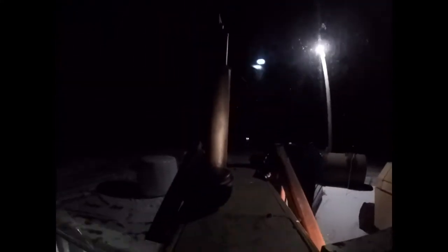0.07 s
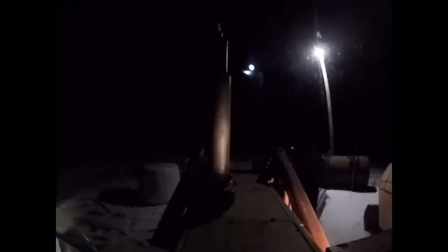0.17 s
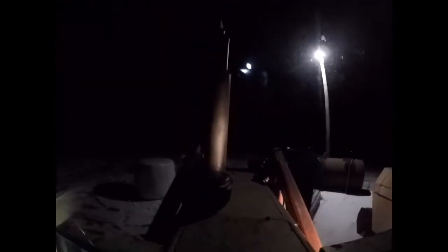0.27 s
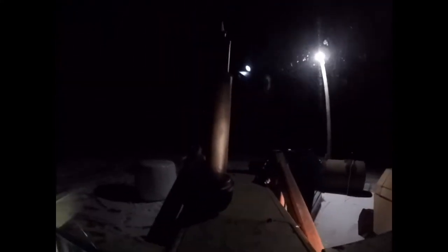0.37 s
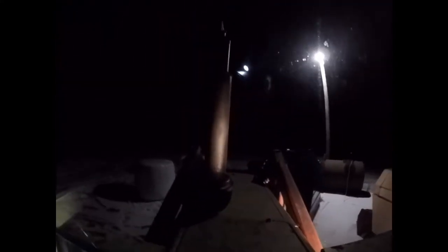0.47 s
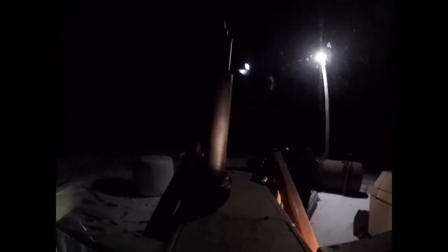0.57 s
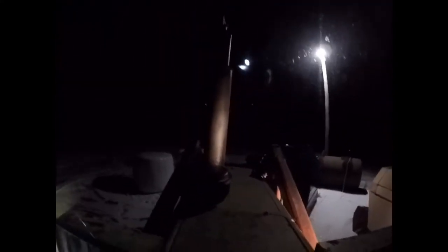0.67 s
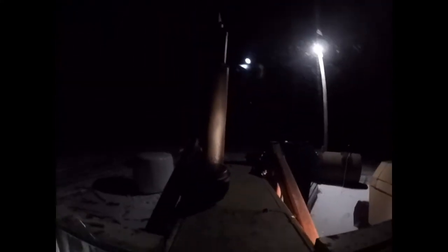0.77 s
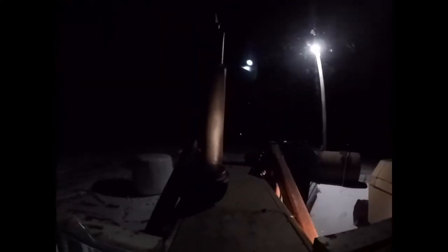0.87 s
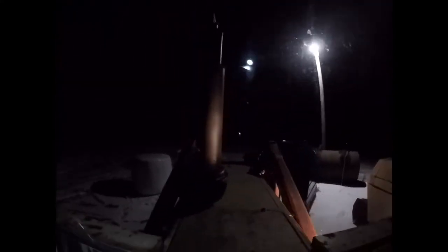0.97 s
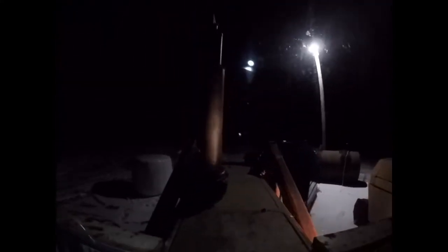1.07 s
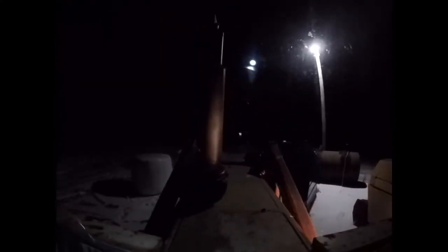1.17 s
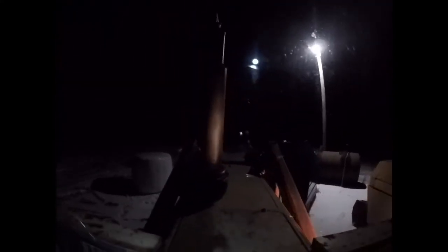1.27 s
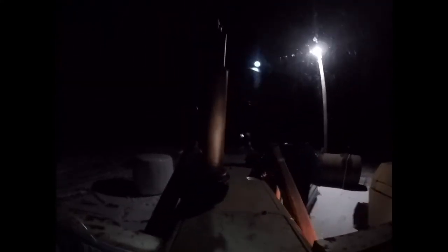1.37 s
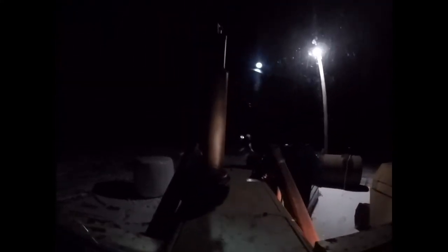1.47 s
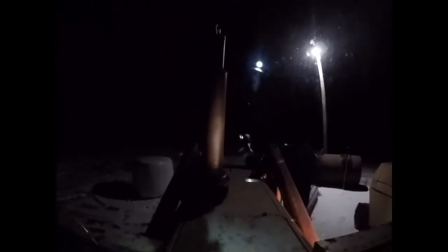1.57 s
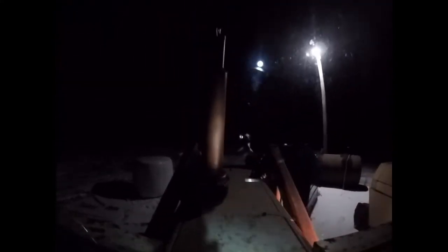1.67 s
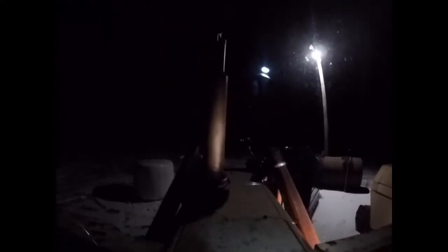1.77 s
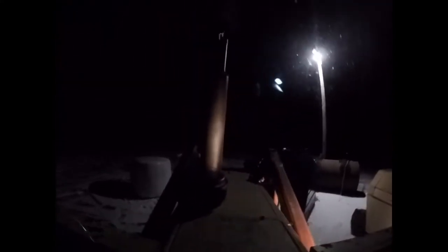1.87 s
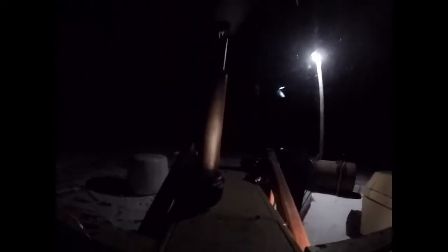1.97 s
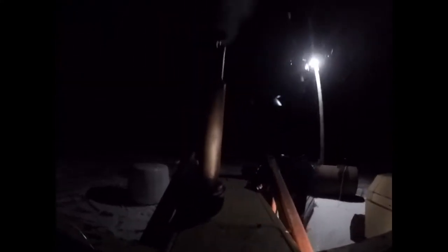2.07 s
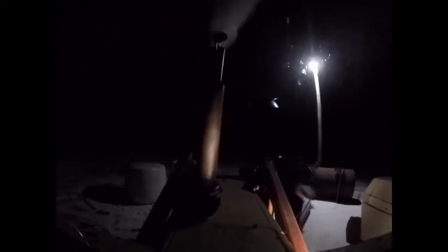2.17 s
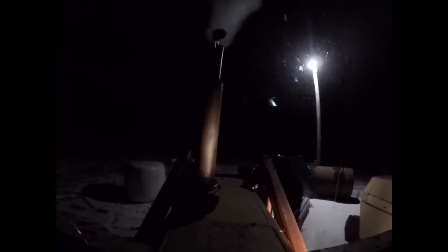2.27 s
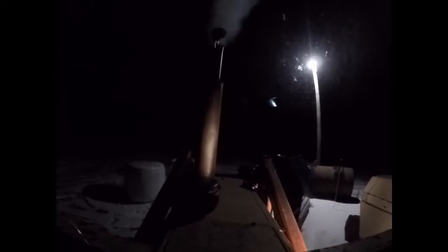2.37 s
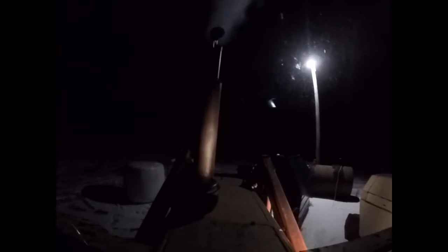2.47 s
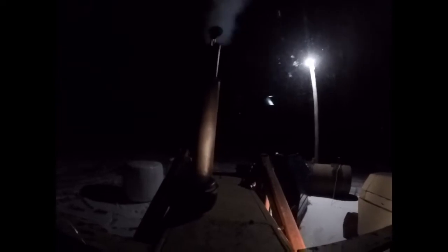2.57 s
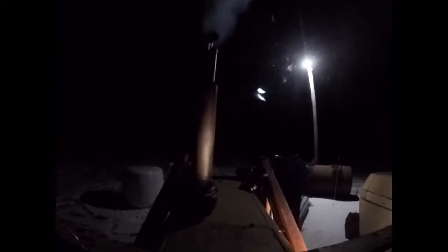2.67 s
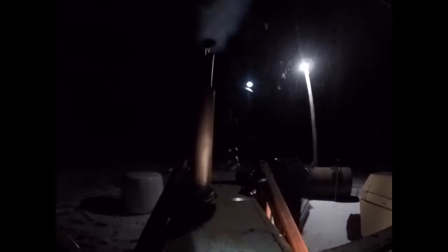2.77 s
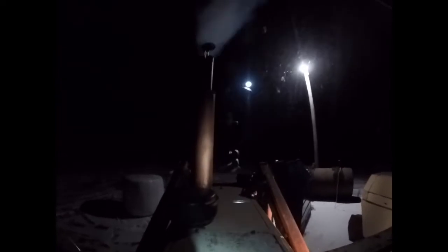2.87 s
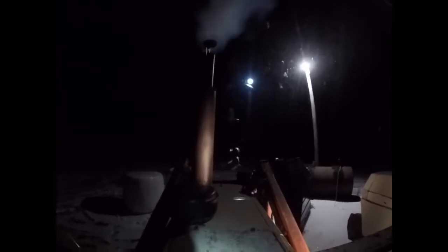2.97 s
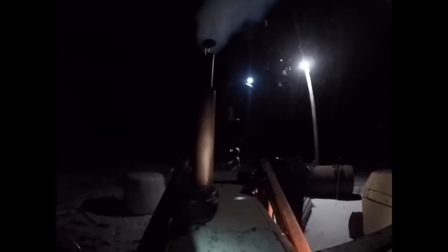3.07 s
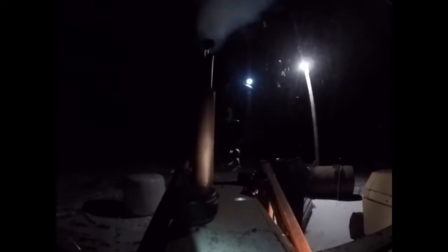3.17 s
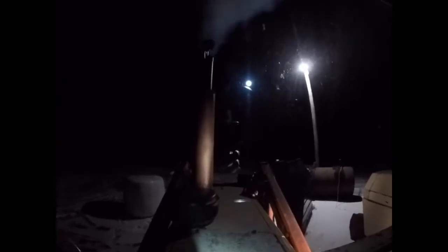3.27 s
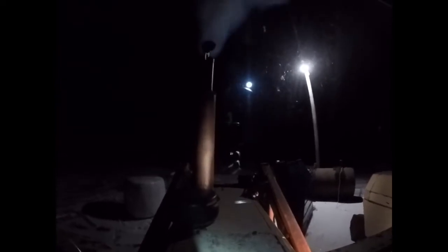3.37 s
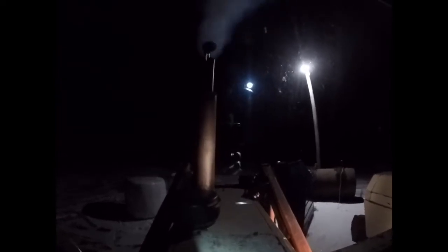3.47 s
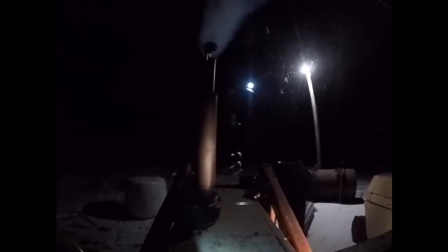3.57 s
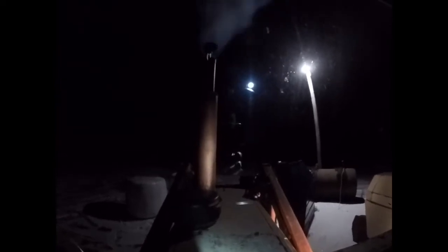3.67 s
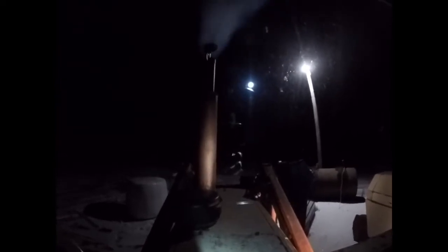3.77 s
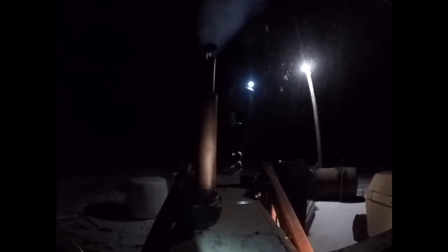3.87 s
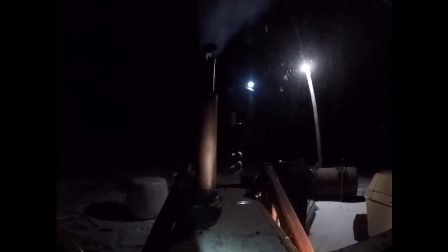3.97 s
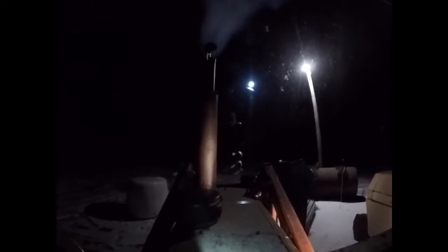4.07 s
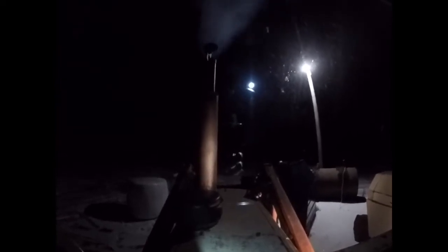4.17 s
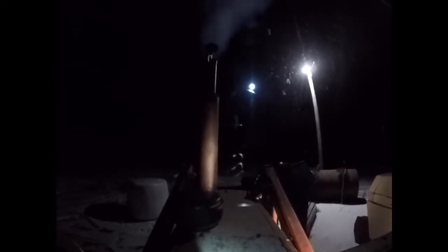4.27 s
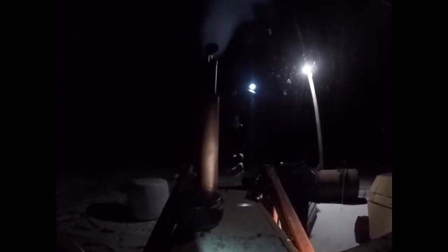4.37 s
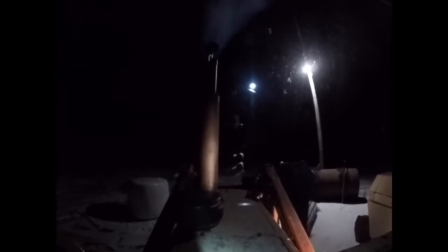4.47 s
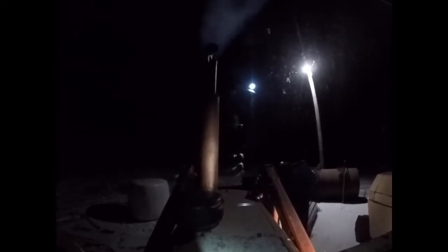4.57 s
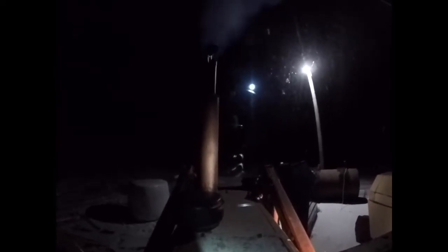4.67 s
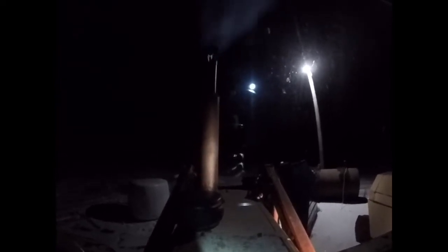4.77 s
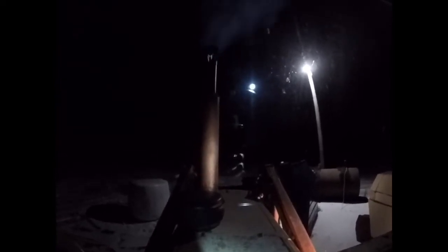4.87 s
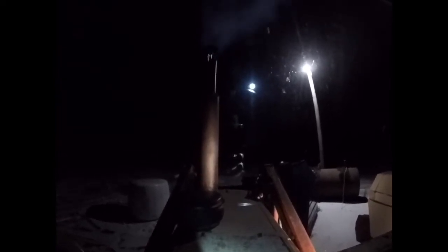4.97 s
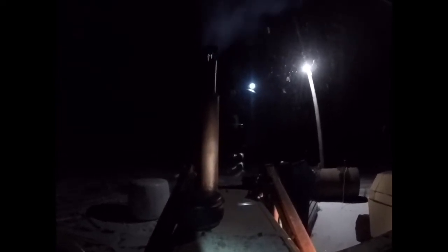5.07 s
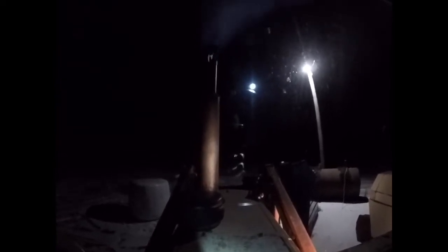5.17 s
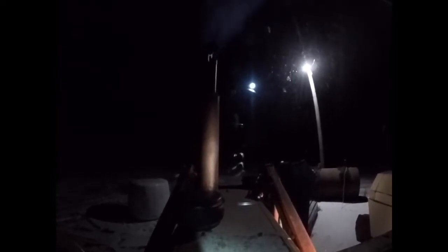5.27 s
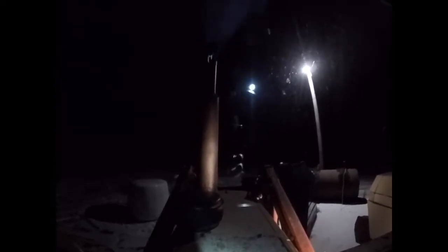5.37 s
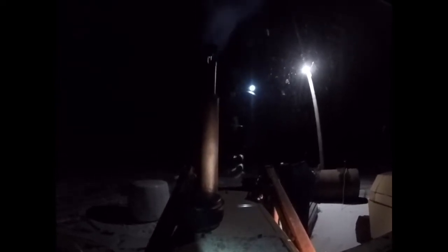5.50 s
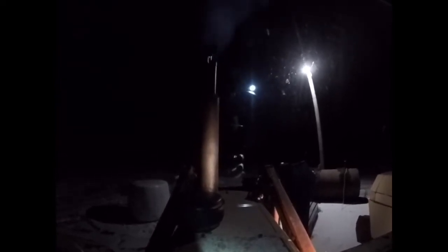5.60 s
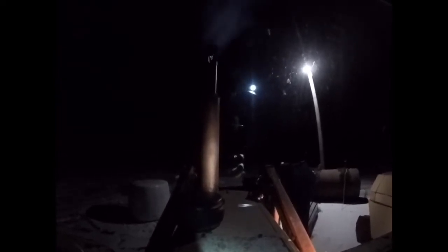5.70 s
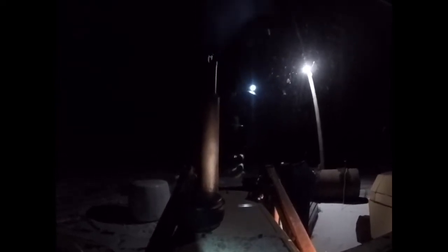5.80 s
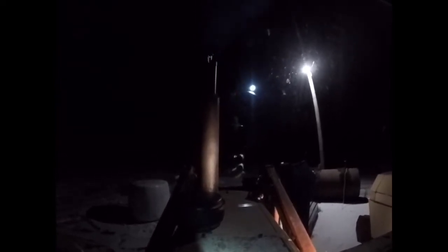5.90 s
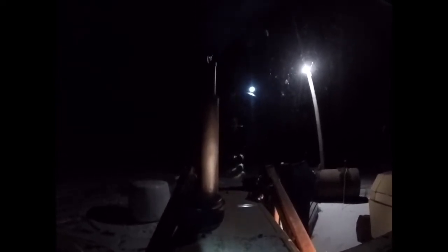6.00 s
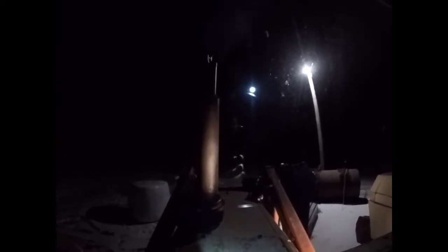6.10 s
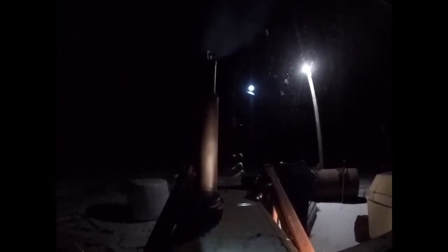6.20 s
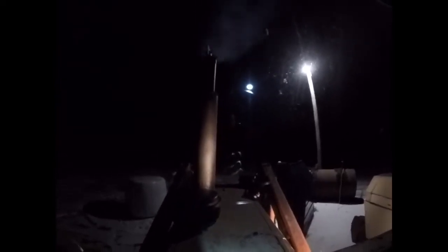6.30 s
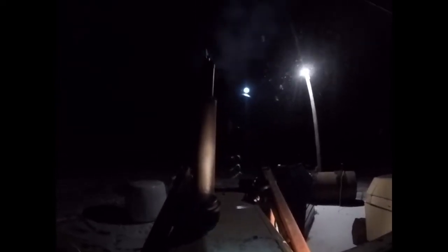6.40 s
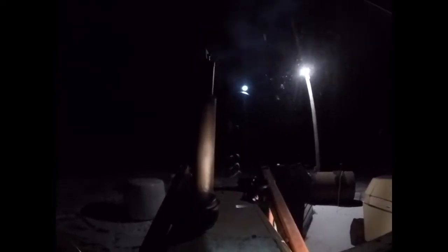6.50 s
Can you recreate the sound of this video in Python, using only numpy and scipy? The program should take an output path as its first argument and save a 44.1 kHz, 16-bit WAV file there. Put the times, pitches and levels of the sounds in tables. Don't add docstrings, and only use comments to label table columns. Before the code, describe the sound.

For the first 0.8 seconds the tractor cab is nearly silent: faint hiss, low handling bumps and small, soft clicks of switches and levers. At about 0.85 a solenoid clunks and the starter bites, a gritty, rasping whine that sags on compressions, with dull thumps, until 1.2. Around 1.3 to 1.4 the diesel catches with heavy thuds and puffs, heaving unevenly as it races up until about 2.1. By 2.5 it holds a fast, loud, boomy drone with panel rattle, valve clatter and irregular cold knocks once a cycle. Loose door and glass parts buzz between 3.2 and 4.4. From 4.5 the knocking is gone, the tone is warmer and smoother, with a very faint high turbo whistle. At 5.95 the throttle closes; pitch slides down, clatter dulls, soft leaking hisses pulse each cycle, and the sound cuts off at about 6.5, still running.

```python
import sys
import numpy as np
from scipy import signal
from scipy.io import wavfile
from scipy.ndimage import uniform_filter1d

SR = 44100
rng = np.random.default_rng(int(sys.argv[2]) if len(sys.argv) > 2 else 0)


def ratio_of_db(decibels):
    return 10 ** (np.asarray(decibels, float) / 20)


def unload_wav(signal):
    wavfile.write(
        sys.argv[1],
        SR,
        np.round(np.clip(np.atleast_2d(signal).T, -1, 1) * 32767).astype(np.int16),
    )


N = 288414

# (time [s], firing rate [Hz])
SPEED = [(1.25, 18), (1.45, 27.3), (1.55, 32), (1.7, 39.3), (1.86, 51), (1.95, 56), (2.05, 59.5),
         (2.35, 66), (2.55, 66.7), (2.9, 66.2), (3.2, 67.15), (4.1, 67.8), (4.5, 68.5), (5.6, 68.27),
         (5.95, 68.4), (6.08, 64), (6.35, 50.6), (6.55, 43.6)]
# (multiple of cycle rate, level [dB])
COLD_ORDERS = [(1, -25), (2, -12), (3, -11), (4, -9), (5, -9), (6, -14), (7, -16), (8, -5), (9, -21),
               (10, -7), (11, -9), (12, 0), (13, -1), (14, -9), (15, -8), (16, -4), (17, -8), (18, -6),
               (19, -13), (20, -12), (21, -11), (22, -18), (23, -15), (24, -16), (25, -13), (26, -13),
               (27, -13), (28, -15), (29, -10), (30, -14)]
WARM_ORDERS = [(1, -39), (2, -18), (3, -22), (4, -16), (5, -23), (6, -19), (7, -21), (8, -15), (9, -25),
               (10, -11), (11, -17), (12, 0), (13, -17), (14, -16), (15, -18), (16, -16), (17, -16),
               (18, -14), (19, -20), (20, -19), (21, -16), (22, -29), (23, -21), (24, -22), (25, -19),
               (26, -13), (27, -23), (28, -20), (29, -18), (30, -24)]
COLD_DB, WARM_DB = -18.5, -11
PUSH_CYCLES = .341
ODD_TURN_CYCLES = .25
# (centre [Hz], width [Hz], level [dB])
BOOM = (135.4, 20, 12.3)
# (multiple of cycle rate, cold level [dB], warm level [dB])
GEARS = [
    (50.67, -25, -31),
    (76.8, -28.5, -33.5),
]
CYLINDERS = [
    (-4, -2, -16, -16, 1, -2),
    (-2, -4, -9, -12, -1, 0),
]
# (centre [Hz], width [Hz], level [dB] taken 3.5 times cold and 2.5 times warm, level
# added when warm [dB])
PANELS = [(138.4, 11, -4.5, -21.5), (173.8, 38.6, -3, 0), (216.2, 57, -3, -7), (271.8, 59, -4, -12.5),
          (326.8, 12, -7, -5), (464, 170, -26.5, -19.5), (502.6, 71, -6, -8), (576.2, 10.5, -6.5, -18.5),
          (669.5, 38, -7.5, -12.5), (788.8, 13, -8, -7.5), (859.2, 17, -8, -4.5), (938, 46, -7, -16),
          (1084, 66, -6.5, -14), (1440, 90, -21.5, -34), (1540, 120, -30, -25), (1720, 22, -11, -24.5),
          (1910, 51, -33, -30), (1970, 50, -27, -16), (2200, 200, -30, -24), (2620, 200, -41, -34.5)]
# (frequency [Hz], density [dB per Hz])
BLOCK = [(15, -41.5), (25, -2), (86, -11), (138, 3), (253, -24.5), (329, -8.5), (456, -51.5), (570, -20),
         (644, -23), (873, -13), (1030, -26.5), (1140, -19.5), (1420, -27), (3200, -46), (4160, -98.5),
         (7040, -120)]
# (frequency [Hz], density [dB per Hz])
CLATTER = [(880, -6.5), (1500, -7), (1780, -5), (2230, -10), (2700, -12), (3090, -16.5), (3860, -15.5),
           (5150, -19.5), (6070, -18), (7580, -31.5), (8840, -30), (11100, -49), (13300, -37.5),
           (15000, -69)]
# (time [s], level [dB])
SHAKE = [(.836, -39), (.868, -36.5), (.888, -12.5), (.93, -19.5), (1.0, -21), (1.158, -22.5), (1.204, -26),
         (1.25, -16.5), (1.29, -22.5), (1.344, -19), (1.42, -13.5), (2.15, -14), (2.8, -14), (4.3, -13.5),
         (5.85, -14.5), (6.3, -17.5), (6.4, -18.5), (6.54, -18)]
# (time [s], lift [dB])
HEAVES = [
    (1.44, 5),
    (1.614, 9),
    (1.784, 3.5),
    (1.908, 8),
    (2.038, 1.5),
    (2.125, 2.5),
    (2.8, 1),
]
HEAVE_RISE_S, HEAVE_FALL_S = 0.03, 0.035
CATCH_S, GOVERNED_S, SHUT_S, SHUT_LAG_S = 1.39, 2.69, 5.9, 0.17
# (offset [dB], share of shake, share of heave, full-fuel lift [dB], shut-fuel lift [dB])
LAYERS = [
    (-13, 1.06, 1.65, 4.5, 4),
    (0, 0.98, 0.9, -1, 1),
    (-3, 1.004, 0.74, 1.5, -2.5),
    (-22, 0.74, 0.47, 3, -2),
    (-42, 0.64, 0.5, 6.5, -9),
]
CRANK_THUD_DB, CRANK_CLATTER_DB = 5.5, 6.5
# (firing rate [Hz], firing tone [dB], other cycle tones [dB])
CAB_PASS = [(19, -67, -41), (25.9, -20, -23), (30.6, -38.5, -31), (37.2, -27, -29), (39.7, -43, 1),
            (45.5, -24.5, -11.5), (53, -21.5, -7), (66.5, -39, 1), (66.7, -37.5, 0.5)]
FULL_FUEL_DB, FIRING_WAVER_DB = 14, 4.5
OCTAVE_DB, OCTAVE_BOOM_DB, OCTAVE_WIDTH_HZ, OCTAVE_SHUT_DB = -38, 21.5, 23, -5
# (time [s], warmth [0-1], boom lift [dB])
SETTLING = [(2.5, 0.01, 1.5), (3.0, 0, 0.5), (3.15, 0.1, 0), (3.3, 0.18, -0.5), (3.6, 0.05, -13),
            (3.8, 0.02, -1), (4.2, 0.12, -0.5), (4.5, 0.63, 3.5), (5.0, 0.94, 6)]
CHUFF_GAIN, CHUFF_CYCLES = 1.6, .93
SHUT_DULL_HZ, SHUT_DULL_S, SHUT_DULL_SHARE = 4600, .33, .85
# (time [s], peak [dB])
KNOCKS = [(1.376, -8.5), (1.415, -14), (1.461, -10), (1.521, -7.5), (1.617, -8.5), (1.685, -14.5),
          (1.778, -5.5), (1.84, -6.5), (1.923, -18), (2.019, -5), (2.127, -8), (2.223, -5), (2.321, -11),
          (2.407, -3), (2.499, -17), (2.593, -3), (2.675, -4.5), (2.768, -6.5), (2.858, -5), (2.949, -5),
          (3.041, -9.5), (3.132, -6.5), (3.221, -17.5), (3.312, -10.5), (3.402, -10.5), (3.485, -12.5),
          (3.58, -19), (3.665, -20), (3.753, -18.5), (3.845, -9.5), (3.929, -26.5), (4.017, -15.5),
          (4.106, -18), (4.198, -10.5), (4.278, -11), (4.37, -8.5), (4.457, -9.5), (4.546, -15)]
# (centre [Hz], width [Hz], level [dB])
KNOCK_RINGS = [(829, 45, -5.5), (966, 56, -5.5), (1150, 59, -2), (1364, 58, -19), (1855, 57, -14.5)]
KNOCK_DB, KNOCK_FADE_S, LULL_DB, LULL_S = -16.5, .05, -4, .01
# (time [s], tooth rate [Hz], second partial [dB], third partial [dB])
PINION = [(0.88, 305.3, -54, -45), (0.916, 285.8, -15, -25), (0.996, 280.8, -39, -27.5),
          (1.036, 289.3, -35, -25), (1.05, 344, -24, -32), (1.083, 353, -24, -34),
          (1.1, 327.3, -26.5, -20.5), (1.16, 283.6, -26, -28), (1.205, 294, -23, -27)]
# (multiple of tooth rate, level re third partial [dB])
OVERTONES = [(4, -14), (5, -15), (6, -32), (7, -25), (8, -28), (9, -29)]
MESH_JITTER, MESH_WAVER_DB, MESH_RELEASE_S = .007, 4, .02
# (time [s], frequency [Hz], level [dB])
ARMATURE = [(.88, 84, -49), (.93, 83.8, -24.5), (1.02, 80, -22), (1.1, 78.6, -25.5), (1.17, 80, -27),
            (1.22, 73, -67)]
# (time [s], level [dB])
RASP = [(.88, -60), (.9, -32), (.95, -49), (1.0, -25), (1.05, -28), (1.09, -30.5), (1.15, -27.5),
        (1.19, -37), (1.22, -65)]
# (frequency [Hz], level [dB])
TEETH = [(900, -9.5), (1300, 6.5), (2000, 2), (2600, -3.5), (3300, -2.5), (4500, -4), (5200, -11),
         (7000, -26)]
# (time [s], peak [dB], pitch [Hz], t60 [s])
THUMPS = [(0.879, -14.5, 1246, 0.13), (0.885, -14, 967, 0.13), (0.908, -1, 290, 0.048),
          (0.93, -7.5, 154, 0.41), (1.265, -1, 298, 0.037), (1.314, -4.5, 129.5, 0.2),
          (1.368, -11.5, 911, 0.21), (1.42, -8, 343, 0.19), (1.471, -8, 288.5, 0.55),
          (1.65, -8, 282.4, 0.87)]
# (time [s], peak [dB], centre [Hz], width [Hz], t60 [s])
PUFFS = [(.844, -23, 1270, 1570, 0.97), (.846, -32.5, 6900, 2040, 0.31), (.877, -26, 7060, 2000, 0.1),
         (.878, -15, 2920, 3020, 0.1), (.988, -12.5, 5850, 895, 0.037), (1.13, -13.5, 5800, 1500, 0.11),
         (1.224, -24, 5440, 1500, 0.47), (1.226, -10, 2370, 2500, 0.16), (1.303, -12.5, 1470, 1200, 0.22),
         (1.366, -16.5, 5160, 1500, 0.094), (1.44, -14.5, 1270, 447, 1), (1.55, -18.5, 1410, 600, 0.99),
         (1.69, -10.5, 2040, 500, 0.08), (.85, -38, 10900, 4000, 0.27)]
# (start [s], length [s], level [dB], pitch [Hz])
HOUSING = [(.985, .06, -27, 856), (.995, .04, -33, 2522), (1.035, .05, -34, 1752), (1.075, .06, -31, 1752),
           (1.05, .07, -36, 3148), (1.09, .085, -36, 2010), (1.03, .05, -36, 1433), (1.12, .06, -35, 1436),
           (1.14, .065, -25, 857)]
# (time [s], low line [Hz], low level [dB], high line [Hz], high level [dB])
TURBO = [(4.3, 5500, -69, 14900, -99), (4.9, 5620, -56, 14900, -88.5), (5.9, 5530, -56.5, 14700, -94.5),
         (6.03, 5240, -51, 14100, -72), (6.13, 4970, -50, 14000, -76), (6.3, 4700, -53.5, 13300, -87),
         (6.55, 4180, -54, 12260, -78)]
# (time [s], peak [dB])
LEAK_TIMES = [(6.012, -42), (6.112, -35.5), (6.218, -37), (6.342, -37.5), (6.475, -35.5)]
# (level [dB], centre [Hz], width [Hz], t60 [s])
LEAK_BANDS = [
    (2, 5200, 2400, 0.22),
    (3.5, 2920, 410, .2),
    (-16, 12000, 4000, .1),
]
# (start [s], length [s], level [dB], pitch [Hz])
BUZZES = [(3.17, 0.14, -11.5, 171.8), (3.41, 0.13, -12, 168), (3.48, 0.08, -13, 189),
          (3.62, 0.091, -13, 174.5), (3.87, 0.07, -17, 175), (3.971, 0.069, -17.5, 195.5),
          (4.11, 0.14, -12, 188), (4.28, 0.086, -16.5, 183), (3.593, 0.096, -19, 323),
          (3.656, 0.19, -21, 321), (3.943, 0.045, -16.5, 320.5), (4.074, 0.092, -19.5, 316),
          (4.235, .1, -16, 317.6), (6.05, 0.12, -11, 150), (6.23, 0.13, -20.5, 177.6)]
# (start [s], length [s], level [dB], pitch [Hz])
NUDGES = [(0.099, 0.034, -34, 45), (0.195, .045, -39, 42), (0.296, 0.03, -37, 40), (0.398, .035, -40, 45),
          (.61, 0.031, -38, 70), (0.707, 0.042, -45, 50)]
# (time [s], peak [dB], centre [Hz], width [Hz], t60 [s])
CLICKS = [(.005, -34.5, 634, 910, 0.48), (.041, -41, 1090, 500, .06), (.149, -36.5, 3507, 3500, 0.058),
          (.251, -36, 1600, 2000, 0.08), (.357, -39, 1100, 1200, 0.08), (.685, -47, 6895, 900, 0.11),
          (.7, -47, 1210, 1500, 0.44)]
# (frequency [Hz], density [dB per Hz])
QUIET = [(12, -30), (20, 6), (50, 1), (92, -10), (160, -7), (693, -16), (1390, -21.5), (5240, -32),
         (10200, -33), (12700, -46.5), (15000, -46)]
# (time [s], lift [dB])
BUMPS = [(0, 18.5), (.245, 12.5), (.364, 6), (.626, -1.5), (.74, 8)]
QUIET_DB, RUMBLE_DB, BUMP_RISE_S, BUMP_FALL_S = -52, -46, 0.11, 0.054


def evened(x):
    return x / np.sqrt(np.mean(x ** 2) + 1e-20)


def curves(rows, outside=None):
    s, *columns = np.transpose(rows)
    return [np.interp(np.arange(N) / SR, s, c, outside, outside) for c in columns]


def coloured(x, points):
    hz, db = np.transpose(points)
    bins_hz = np.fft.rfftfreq(8192, 1 / SR)
    half = np.interp(np.log(bins_hz + 1), np.log(hz), db) * np.log(10) / 20
    full = np.r_[half, half[-2:0:-1]]
    response = np.fft.ifft(np.exp(np.conj(signal.hilbert(full)))).real[:4096]
    return signal.oaconvolve(x, response)[:N]


def band(x, lo_hz, hi_hz):
    y = signal.sosfilt(signal.butter(3, [lo_hz, hi_hz], "band", fs=SR, output="sos"), x)
    return y / np.sqrt(abs(uniform_filter1d(y ** 2, size=11000)) + 1e-12)


def dulled(x, hz, order):
    return signal.sosfilt(signal.butter(order, hz, fs=SR, output="sos"), x)


def ring(x, hz, width_hz):
    pole = np.exp((2j * np.pi * hz - np.pi * width_hz) / SR)
    return 2 * signal.lfilter([1 - abs(pole)], [1, -pole], x).real


def wander(rate_hz, count, size=N):
    knots = rng.standard_normal((count, 400))
    place = np.arange(size) / size * N / SR * rate_hz
    return np.array([np.interp(place, np.arange(len(k)), k) for k in knots]) * 1.2


def bursts(rows, rise_s=0.014):
    out, t = np.zeros(N + SR), np.arange(8000) / SR
    for s, db, hz, width_hz, t60_s in rows:
        puff = ring(ring(rng.standard_normal(len(t)), hz, width_hz), hz, width_hz)
        puff = evened(ring(puff, hz, 2 * width_hz))
        out[round(s * SR):][:len(t)] += .5 * ratio_of_db(db - 60 * t / t60_s) * puff * np.minimum(t / rise_s, 1)
    return out[:N]


def swells(rows):
    out = np.zeros(N + SR)
    for s, length_s, db, hz in rows:
        t = np.arange(0, length_s, 1 / SR)
        tone = np.sin(np.pi * t / length_s) * np.sin(2 * np.pi * hz * t)
        out[round(s * SR):][:len(t)] += np.sqrt(2) * ratio_of_db(db) * tone
    return out[:N]


def lifts(rows, rise_s, fall_s):
    t = np.arange(N) / SR
    return sum(db * np.exp(-abs(t - s) / np.where(t < s, rise_s, fall_s)) for s, db in rows)


def engine():
    hz, = curves(SPEED)
    *tones_db, warm = tone_levels(hz)
    warm = np.clip(warm, 0, 1)
    fires = np.cumsum(hz) / SR + .55
    kicks = firing_kicks(fires, warm)
    t = np.arange(3000) / SR
    burst = evened(signal.oaconvolve(kicks, (1 - np.exp(-t / .004)) * np.exp(-t / .011))[:N])
    chance = (rng.exponential(1, N), rng.random(N) < 2500 / SR, rng.choice([-1, 1], N))
    ticks = evened(ratio_of_db(4.4 * np.minimum(chance[0], 5)) * chance[1] * chance[2])
    rattle = evened(rng.standard_normal(N) + 0.55 * ticks)
    knock, lull_db = knocks(rattle)
    body = cab_body(fires, warm, kicks, burst, rattle)
    clatter = valve_gear(fires, burst, ticks)
    thud_db, low_db, ring_db, clatter_db, fizz_db = layer_levels()
    valves = band(clatter, 1270, 7270)
    dull = SHUT_DULL_SHARE * np.clip((np.arange(N) / SR - SHUT_S) / SHUT_DULL_S, 0, 1)
    valves = (1 - dull) * valves + dull * dulled(valves, SHUT_DULL_HZ, order=2)
    out = orders(fires, hz, *tones_db, warm) + knock
    out += ratio_of_db(thud_db) * band(body, 37, 95)
    out += ratio_of_db(low_db) * band(body, 139.7, 474)
    out += ratio_of_db(ring_db + lull_db) * band(body, 468, 2230)
    out += ratio_of_db(clatter_db) * valves
    return out + ratio_of_db(fizz_db) * band(clatter, 7140, 13800)


def firing_kicks(fires, warm):
    at = np.flatnonzero(np.diff(np.floor(fires)))
    cold_db, warm_db = np.array(CYLINDERS)[:, fires[at + 1].astype(int) % 6]
    luck = rng.standard_normal((600, 2))[:len(at)]
    late = np.clip(at + 40 * luck[:, 1], 0, N - 1).astype(int)
    uneven = 1 - .85 * fuel()[2][at]
    kicks = np.zeros(N)
    kicks[late] = ratio_of_db(uneven * ((1 - warm[at]) * cold_db + warm[at] * warm_db + 4) + 1.5 * luck[:, 0])
    return kicks


def cab_body(fires, warm, kicks, burst, rattle):
    push = np.exp(3 * (np.cos(2 * np.pi * (fires / 6 - CHUFF_CYCLES)) - 1))
    chuff = CHUFF_GAIN * (1 - fuel()[2]) * push
    thin = evened((.8 + .5 * burst + chuff) * rattle)
    middle = evened((1.6 + burst) * rattle) + .3 * evened(kicks)
    big = evened((1.7 + burst) * rattle) + .2 * evened(kicks)
    panels = np.zeros(N)
    for hz, width_hz, cold_db, warm_db in PANELS:
        drive = thin if hz > 1300 else middle if hz > 750 else big
        mode = evened(ring(ring(drive, hz, width_hz), hz, 2.25 * width_hz))
        panels += ratio_of_db((3.5 - warm) * cold_db + warm * warm_db) * mode
    return evened(panels) + 0.48 * evened(coloured(thin, BLOCK))


def valve_gear(fires, burst, ticks):
    flutter = ratio_of_db(0.59 * wander(30., count=1)[0])
    valve = np.exp(2.5 * (np.cos(2 * np.pi * (fires / 6 - .47)) - 1))
    noise = evened(rng.standard_normal(N) + .5 * ticks)
    return coloured((48.0 + burst + 1.2 * valve) * flutter * noise, CLATTER)


def knocks(rattle):
    s, db = np.transpose(KNOCKS)
    blows, t = np.zeros(N), np.arange(6000) / SR
    blows[(s * SR).astype(int)] = ratio_of_db(db)
    fade = signal.oaconvolve(blows, np.exp(-t / KNOCK_FADE_S))[:N]
    strike = rattle * fade + 16.0 * blows
    rung = np.zeros(N)
    for hz, width_hz, own_db in KNOCK_RINGS:
        mode = ring(ring(strike, hz, width_hz), hz, 2.0 * width_hz)
        rung += ratio_of_db(own_db) * mode / np.sqrt(width_hz / SR)
    lull = signal.oaconvolve(np.sign(blows[::-1]), np.exp(-t / LULL_S))[:N][::-1]
    return ratio_of_db(KNOCK_DB) * dulled(rung, 2400, order=4), LULL_DB * uniform_filter1d(lull, size=180)


def boom_db(hz):
    return BOOM[2] / (1 + (2 * (hz - BOOM[0]) / BOOM[1]) ** 2)


def orders(fires, hz, firing_db, octave_db, rest_db, warm):
    controls = np.array([fires, hz, firing_db, octave_db, rest_db, warm])
    fires, hz, firing_db, octave_db, rest_db, warm = controls[:, ::16]
    out, waver = np.zeros(len(hz)), wander(9., count=30, size=len(hz))
    for (k, cold_db), (_, warm_db), w in zip(COLD_ORDERS, WARM_ORDERS, waver):
        db = (1 - warm) * (COLD_DB + cold_db - boom_db(k * 11.06))
        db = db + warm * (WARM_DB + warm_db - boom_db(k * 11.0))
        db = db + boom_db(k * hz / 6) + rest_db + .1 * k * (w - .6)
        if k == 6:
            db = firing_db + FIRING_WAVER_DB * w * (hz > 62)
        if k == 12:
            db = octave_db + .5 * w
        scatter = (rng.random() - .5) * min((k / 12) ** 5, 1)
        scatter = scatter + ODD_TURN_CYCLES * (1 - .6 * warm) * (k % 2) + .2 * (k in (10, 14)) + .05 * w
        out += np.sqrt(2) * ratio_of_db(db) * np.cos(2 * np.pi * (k * (fires / 6 + PUSH_CYCLES) + scatter))
    shut = fuel()[2][::16]
    for (k, cold_db, warm_db), w in zip(GEARS, waver):
        db = (1 - warm) * cold_db + warm * warm_db + 2 * rest_db - 15 * shut + 2.4 * w
        out += np.sqrt(2) * ratio_of_db(db) * np.cos(2 * np.pi * k * fires / 6)
    return signal.resample_poly(out, 16, 1)[:N]


def fuel():
    t = np.arange(N) / SR
    caught = np.clip((t - CATCH_S) / 0.0099, 0, 1)
    full = caught * np.clip((GOVERNED_S - t) / 1.14, 0, 1)
    return 1 - caught, full, np.clip((t - SHUT_S) / SHUT_LAG_S, 0, 1)


def tone_levels(hz):
    speeds_hz, firing_db, rest_db = np.transpose(CAB_PASS)
    warm, lift_db = curves(SETTLING)
    crank, full, shut = fuel()
    boom = 1 / (1 + (2 * (2 * hz - BOOM[0]) / OCTAVE_WIDTH_HZ) ** 2)
    octave_db = OCTAVE_DB + boom * (OCTAVE_BOOM_DB + lift_db) - 60 * crank + OCTAVE_SHUT_DB * shut
    firing_db = np.interp(hz, speeds_hz, firing_db) + FULL_FUEL_DB * full
    return firing_db, octave_db, np.interp(hz, speeds_hz, rest_db), warm


def layer_levels():
    shake_db, = curves(SHAKE)
    heave_db = lifts(HEAVES, HEAVE_RISE_S, HEAVE_FALL_S)
    crank, full, shut = fuel()
    shake_db = shake_db - 80 * (np.arange(N) / SR < SHAKE[0][0])
    thud, low, panel, *valves = [db + a * shake_db + b * heave_db + full_db * full + shut_db * shut
                                 for db, a, b, full_db, shut_db in LAYERS]
    return thud + CRANK_THUD_DB * crank, low, panel, *(v + CRANK_CLATTER_DB * crank for v in valves)


def starter():
    mesh_hz, second_db, third_db = curves(PINION, -88.5)
    grain = rng.standard_normal(N)
    worn = evened(uniform_filter1d(uniform_filter1d(grain, size=200), size=200))
    teeth = 2 * np.pi * np.cumsum(mesh_hz * (1 + MESH_JITTER * worn)) / SR
    whine = ratio_of_db(second_db) * np.sin(2 * teeth) + ratio_of_db(third_db) * np.sin(3 * teeth)
    whine += ratio_of_db(third_db - 3.0) * np.sin(teeth)
    for k, db in OVERTONES:
        whine += ratio_of_db(third_db + db) * np.sin(k * teeth + k ** 2)
    whine = whine * ratio_of_db(MESH_WAVER_DB * worn[::-1])
    whine = whine * np.clip((PINION[-1][0] - np.arange(N) / SR) / MESH_RELEASE_S, 0, 1)
    hum_hz, hum_db = curves(ARMATURE, -81.5)
    hum = ratio_of_db(hum_db) * np.sin(2 * np.pi * np.cumsum(hum_hz) / SR)
    out = np.sqrt(2) * (whine + hum)
    strikes = np.diff(np.floor(teeth / 2 / np.pi), prepend=0) * ratio_of_db(5. * grain)
    scrape = (2.0 + np.cos(teeth)) * rng.standard_normal(N)
    rasp = coloured(0.6 * evened(strikes) + .5 * scrape, TEETH)
    out += ratio_of_db(curves(RASP, -98)[0]) * band(rasp, 760, 9000)
    t = np.arange(8000) / SR
    for s, db, hz, t60_s in THUMPS:
        thump = ratio_of_db(db - 60 * t / t60_s) * np.sin(2 * np.pi * hz * t) * np.minimum(t / 0.0018, 1)
        out[round(s * SR):][:len(t)] += thump
    return out + bursts(PUFFS)


def turbo():
    low_hz, low_db, high_hz, high_db = curves(TURBO)
    noise = rng.standard_normal((2, N))
    out = np.zeros(N)
    for hz, db, hiss in (low_hz, low_db, noise[0]), (high_hz, high_db, noise[1]):
        waver = evened(ring(hiss, 0, 110))
        out += ratio_of_db(db) * waver * np.sqrt(2) * np.sin(2 * np.pi * np.cumsum(hz) / SR)
    return out * (np.arange(N) / SR > TURBO[0][0])


def leaks():
    return bursts([(s, db + own_db, hz, width_hz, t60_s)
                   for s, db in LEAK_TIMES for own_db, hz, width_hz, t60_s in LEAK_BANDS])


def cab():
    still = coloured(rng.standard_normal(N), QUIET)
    hiss = ratio_of_db(QUIET_DB + 0.6 * wander(15.0, count=1)[0]) * band(still, 320, 16000)
    rumble = ratio_of_db(RUMBLE_DB + lifts(BUMPS, BUMP_RISE_S, BUMP_FALL_S)) * band(still, 21, 300)
    return hiss + rumble + bursts(CLICKS, rise_s=0.0045)


def scene():
    return (cab() + starter() + engine() + turbo() + leaks() + swells(HOUSING + BUZZES + NUDGES))[None]


def roll_off(x):
    return signal.sosfilt(signal.butter(12, 15180, fs=SR, output="sos"), x)


def record(dry):
    rounded = 1.044 * np.tanh(dry / 1.186)
    mix = rounded * np.minimum(np.arange(N)[::-1] / 12, 1)
    return roll_off(mix)


dry = scene()
out = record(dry)
unload_wav(out)
```